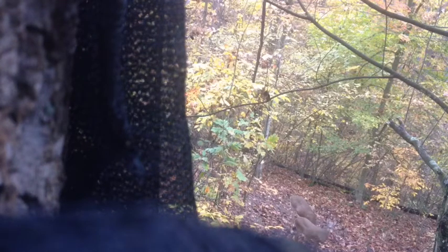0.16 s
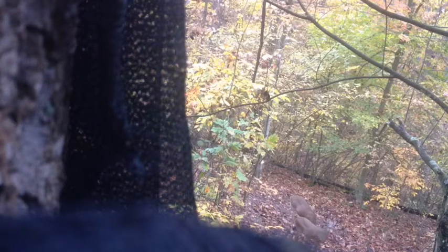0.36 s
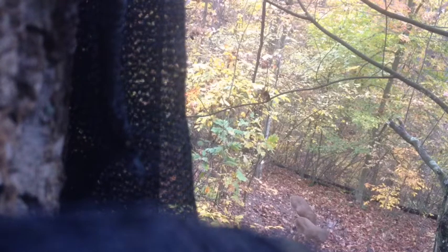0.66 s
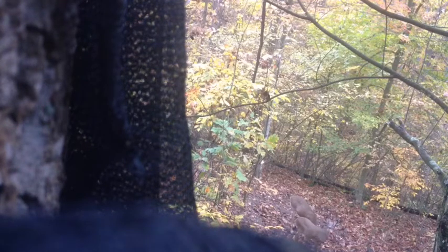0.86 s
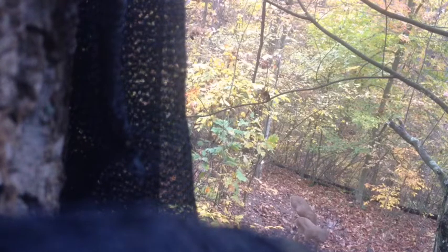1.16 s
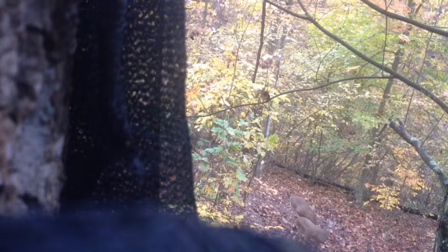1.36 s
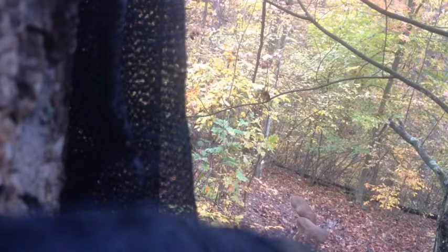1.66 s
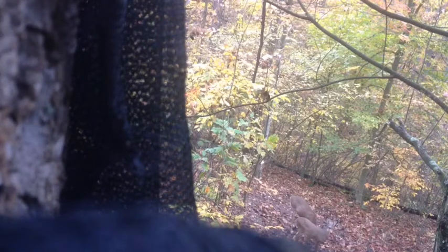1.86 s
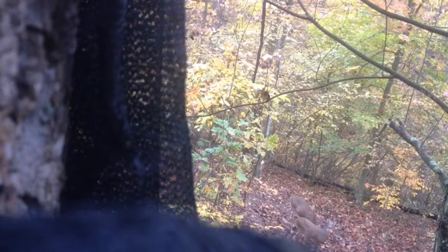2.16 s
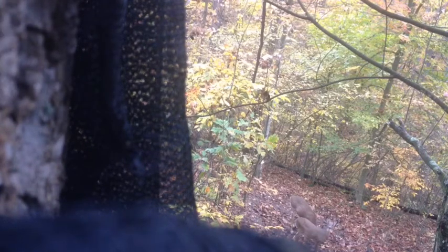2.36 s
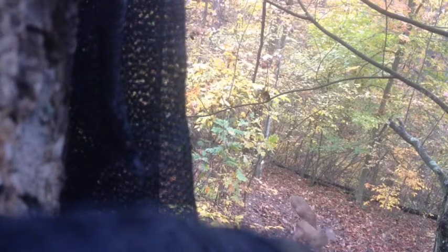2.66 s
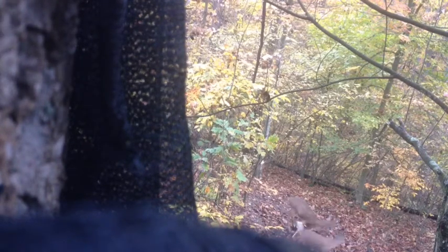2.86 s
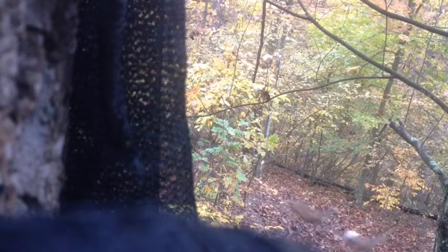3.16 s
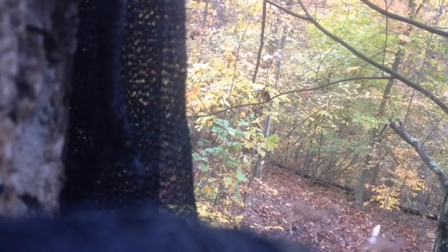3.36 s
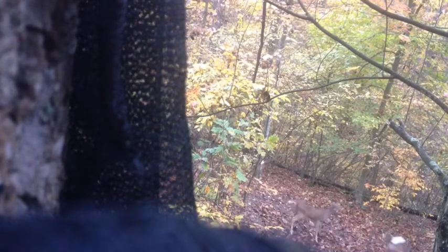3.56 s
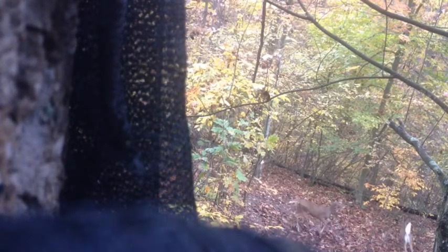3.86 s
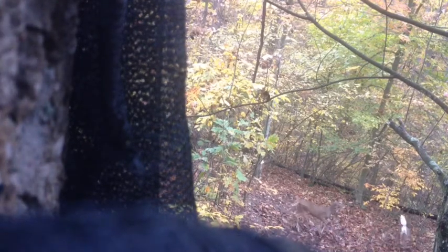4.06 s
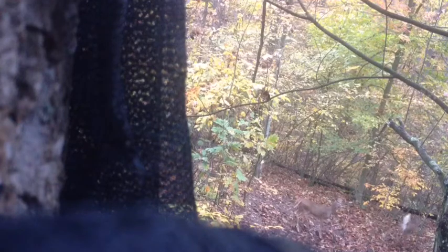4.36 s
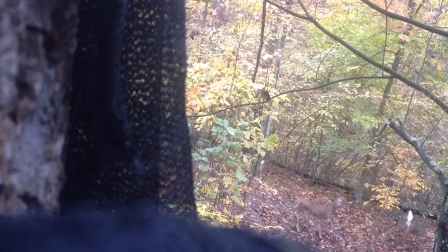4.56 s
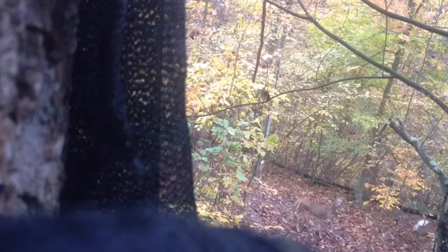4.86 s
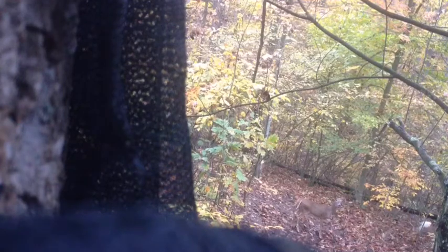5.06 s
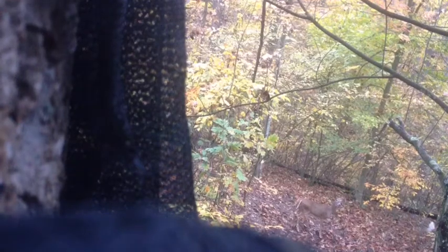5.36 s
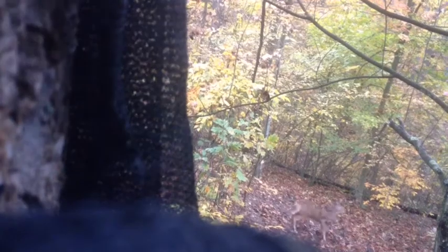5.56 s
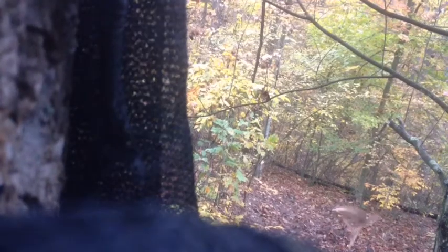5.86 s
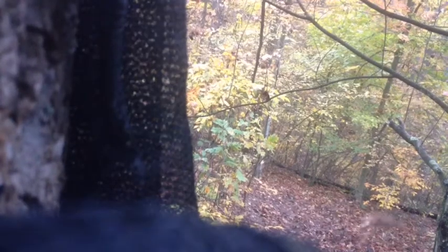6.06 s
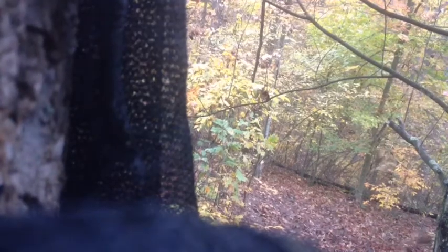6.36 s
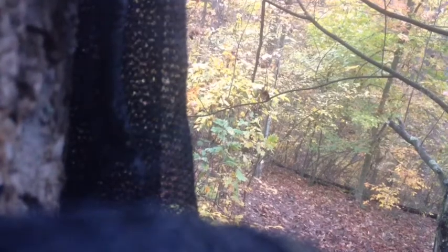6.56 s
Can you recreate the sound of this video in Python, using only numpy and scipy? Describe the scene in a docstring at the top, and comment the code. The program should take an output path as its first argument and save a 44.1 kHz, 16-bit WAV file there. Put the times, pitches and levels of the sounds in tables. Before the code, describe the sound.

Hushed autumn woods. Close to the microphone a bow is drawn with faint scraping, thin squeaks and tiny clicks while a deer steps softly through dry leaves and stops. After a still pause the string releases with a very loud, bright crack and short rattling ring. A quarter second later the arrow hits with a hollow knock, and the deer bolts farther off, crunching leaves and breaking twigs.

```python
"""A bow is drawn and shot right beside the microphone, in quiet autumn woods.
Its arrow slides over the rest as filtered noise and crackle; a deer bounds through dry leaves and stops.
The string cracks into a ring of decaying partials, and the arrow thumps home a quarter second later.
The deer crashes off in bursts of tiny fractures, dull thuds and snapping twigs.
A hush of coloured noise with faint drones lies beneath, and the trunks throw back a scattered echo."""
import sys
import numpy as np
from scipy import signal
from scipy.io import wavfile

SR = 44100
rng = np.random.default_rng(int(sys.argv[2]) if len(sys.argv) > 2 else 0)


def master(y):
    """Save y as 16-bit WAV."""
    cut = np.clip(np.atleast_2d(y).T, -1, 1)
    pcm = np.round(cut * 32767)  # scale
    wavfile.write(sys.argv[1], SR, pcm.astype(np.int16))


N = 296425
TIME = np.arange(N) / SR
HZ = np.fft.rfftfreq(2048, 1 / SR)
BRIEF = SR // 5  # samples in one snap or thud


def draw(squeak_share=.08, sing_db=-10, fullness=.7, glide_per_s=.04, wander=.02,
         bump_db=-54, bump_hz=198, bump_lead_s=.021):
    """The shaft sings thinly over the rest, its resonances rising as it travels; hard pulls rasp and bump."""
    # resonances of the shaft on its rest, before their shift: pitch_hz, width_hz, relative_db
    shaft = [(2750, 420, -5), (3190, 300, -3), (5640, 500, -3), (6170, 500, -8), (7120, 400, -8),
             (7800, 410, -5.5)]
    # colour of the rasp under a hard pull: frequency_hz, relative_db (per Hz)
    rasp_colour = [(90, -12.5), (200, -4), (400, 1), (1300, 1.5), (1900, -3.5), (2750, 10.5), (3300, 3),
                   (3900, 0), (4900, -8.5), (5800, 2), (7000, -2), (9500, -17.5), (13500, -10.5),
                   (15000, -13.5)]
    # hard pulls of the string: start_s, length_s, rasp_db
    pulls = [(2.416, .098, -53), (2.626, .082, -53.5)]
    # thin squeaks of the shaft: start_s, length_s, pitch_hz, level_db
    squeaks = [(2.04, .25, 2680, -67), (2.25, .17, 3180, -69), (2.602, .04, 6150, -56.5)]
    start_s, full_s, end_s = 1.4, 2.55, 3.1
    # friction builds steadily up to full draw, then fades as the bow is held
    friction_db, build_db_per_s, ease_db_per_s, scrape_db = -65.5, 14, 38, -5.5

    t = TIME[(TIME > start_s) & (TIME < end_s)]
    count, to_full, out = len(t), t - full_s, np.zeros(N)
    friction = amp(friction_db + np.minimum(build_db_per_s * to_full, -ease_db_per_s * to_full))
    pull = sum(amp(db) * arch(t, s, length) ** fullness for s, length, db in pulls)

    shift = 1.035 + glide_per_s * to_full + wander * waver(count, per_s=12)
    ring = sum(amp(db) * unit(resonate(rng.standard_normal(count), hz * shift, width))
               for hz, width, db in shaft)
    singing = (friction + amp(sing_db) * pull) * unit(ring)

    slips = crackle(count, per_s=2000, spread_db=3, wash=.8, clump_db=1.4)
    scraping = (amp(scrape_db) * friction + pull) * colour(slips, read(rasp_colour))
    add(out, t[0], singing + scraping)

    for s, length, hz, db in squeaks:
        squeak = unit(resonate(rng.standard_normal(count), hz, squeak_share * hz))
        add(out, t[0], amp(db) * arch(t, s, length) * squeak)
    for s, length, _ in pulls:
        add(out, s + length - bump_lead_s, thud(bump_db, bump_hz, cycles=12))
    return out


def shot(slam_db=-4, rattle_db=-18.3, rattle_t60=0.17, buzz_db=-45, buzz_hz=3200, zip_db=-12, zip_hz=2500):
    """The string zips forward, slams to a stop and leaves the bow ringing and rattling."""
    # partials of limbs, string and riser: pitch_hz, level_db, t60_s
    partials = [(191, -40.5, 0.39), (271, -38.5, .08), (367, -27, 0.044), (442, -19.5, 0.11),
                (491, -27, 0.082), (577, -25, 0.083), (791, -31, .08), (1047, -33, .2), (1103, -28, 0.1),
                (1552, -39, 0.32), (2410, -39, 0.21), (3100, -39.5, 0.22), (3205, -35, 0.22),
                (3495, -31.5, 0.23), (4020, -34, 0.13), (4493, -23.5, 0.099), (4680, -28.5, 0.18),
                (4970, -21.5, 0.054), (5790, -14.5, 0.038), (6130, -29, 0.083), (7160, -30, 0.12),
                (7810, -26.5, 0.13), (8320, -32, .11)]
    # colour of the string's slam: frequency_hz, relative_db (per Hz)
    slam_colour = [(100, -52), (330, -17), (700, -27), (1400, -18), (2000, -14), (2800, -2.5), (4300, 3),
                   (5850, 2.5), (6700, -5), (8300, -13.5), (10000, -22.5), (13000, -9.5), (15000, -17)]
    # colour of the bow's rattle: frequency_hz, relative_db (per Hz)
    rattle_colour = [(80, -40.5), (190, -3.5), (420, 3.5), (700, -3), (1100, -0.5), (1400, -5),
                     (2000, -6.5), (2700, -1.5), (5800, -5.5), (6600, -7), (8400, -2), (9600, -9),
                     (13000, -8.5), (15000, -14.5)]
    shot_s = 5.2083

    out = np.zeros(N)
    ring = modes(partials, rough=.55, flutter_share=.045)
    blow = rng.choice([-1., 1.], SR) * swell(rise=.0002, t60=.03)
    slam = amp(slam_db) * colour(blow, read(slam_colour))
    chatter = crackle(SR, per_s=4000, spread_db=2.5, wash=1, clump_db=1.5)
    chatter = chatter * swell(rise=.003, t60=rattle_t60)
    rattle = amp(rattle_db) * colour(chatter, read(rattle_colour))
    # a loose fitting buzzes on, then seats itself
    buzz = unit(resonate(rng.standard_normal(SR), buzz_hz, width=380)) * swell(rise=.04, t60=.45)
    buzz = buzz * np.interp(TIME[:SR], [.15, .18], [1, 0])
    add(out, shot_s, ring + slam + rattle + amp(buzz_db) * buzz)

    # the last few milliseconds of travel: a short whistle rising from .9 to 1.147 of zip_hz
    run_up = np.linspace(0, 1, 130)
    whistle = np.sin(2 * np.pi * np.cumsum(zip_hz * (.9 + 0.247 * run_up)) / SR)
    add(out, shot_s - len(run_up) / SR, amp(zip_db) * np.sqrt(run_up) * whistle)
    return out


def gear(release_s=5.1893, rush_s=5.2035):
    """Small clicks during the draw; the release trips, the arrow rushes over its rest, loose parts clack."""
    # clicks of the bow and its gear during the draw: start_s, level_db, centre_hz
    clicks = [(1.533, -55, 2400), (1.733, -57, 6440), (2.299, -47, 600), (2.387, -53, 2280),
              (2.574, -43.5, 4740), (2.958, -56.5, 2600)]
    # loose parts clacking after the slam: start_s, level_db
    clacks = [(5.2187, -12), (5.2221, -15), (5.2395, -25), (5.267, -28.5)]

    out = np.zeros(N)
    for s, db, hz in clicks:
        add(out, s, snap(db, hz, octaves=.8, t60=.024))
    add(out, release_s, snap(db=-36.5, hz=3800, octaves=1.5, t60=.079))
    add(out, release_s, snap(db=-39, hz=550, octaves=1.2, t60=.15))
    add(out, rush_s, snap(db=-32, hz=3000, octaves=1.4, t60=.093))
    for s, db in clacks:
        add(out, s, snap(db, hz=7200, octaves=1.4, t60=.005))
    return out


def hit(lead_s=.0215, tick_lead_s=.0178, knock_gap_s=.026, knock_db=-33.5, knock_hz=228, knock_fall_db=8,
        shaft_db=-6, shaft_lag_s=.007):
    """After a rustle and a tick the arrow cracks and knocks hollowly, then jolts a few times, ever weaker."""
    # partials of the ribcage struck by the arrow: pitch_hz, level_db, t60_s
    ribs = [(175, -37, 0.088), (520, -23.5, 0.021), (810, -35, 0.057), (954, -28.5, 0.03),
            (1366, -33.5, 0.031), (1720, -35, 0.018), (2355, -33, 0.031), (7500, -46, .04)]
    hit_s = 5.445

    out = np.zeros(N)
    add(out, hit_s - lead_s, snap(db=-46, hz=700, octaves=1.6, t60=.13))
    tick = snap(db=-42, hz=1800, octaves=.68, t60=.014) + thud(db=-44, hz=400, cycles=15)
    add(out, hit_s - tick_lead_s, tick)
    add(out, hit_s, modes(ribs, rough=0.23, flutter_share=.1))
    add(out, hit_s, snap(db=-36, hz=9000, octaves=1.8, t60=.03))
    add(out, hit_s, snap(db=-43, hz=1200, octaves=1.3, t60=.1))
    for k in range(3):
        s = hit_s + (k + 1) * knock_gap_s
        db = knock_db - k * knock_fall_db
        add(out, s, thud(db, knock_hz, cycles=6.5))
        add(out, s + shaft_lag_s, snap(db + shaft_db, hz=1280, octaves=.35, t60=.04))
    return out


def leaves(stem_hz=1450, stem_octaves=0.89):
    """Each stride crushes a burst of leaves, which go on settling; crushed stems fill the middle."""
    # colour of dry leaves, before its tilt: frequency_hz, relative_db (per Hz)
    leaf_colour = [(60, -26), (170, 14.5), (340, 5), (520, 9.5), (780, 1.5), (1050, 2.5), (1500, 0),
                   (2000, 0.5), (2450, 1), (3800, 0.5), (5000, -0.5), (6800, -1), (9500, -11), (15000, -15)]
    # hooves ploughing the litter: start_s, level_db, rise_s, stems_db (crushed stems, in the colour)
    strides = [(2.725, -50.5, .055, 6.5), (3.107, -51, .051, 5), (3.254, -57.5, .0065, 5),
               (3.455, -57, .07, 1), (3.635, -60, .065, 1.5), (4.054, -56.5, .016, 1), (4.24, -63, .035, 1),
               (5.443, -42.5, .003, -4.5), (5.5, -56, .06, -2), (5.808, -47.5, .009, 2),
               (5.967, -57, .01, 2), (6.062, -48, .005, 4), (6.245, -49, .03, -8), (6.299, -43.5, .01, -1),
               (6.429, -52.5, .005, 1), (6.54, -46.5, .032, -1), (6.639, -52, .024, -2)]
    # stirring beneath the strides, a level curve: time_s, level_db
    stir = [(.8, -84), (1.0, -73), (3.2, -69.5), (4.5, -74), (5.15, -81), (5.55, -66), (5.95, -64),
            (6.12, -53.3), (6.72, -54.3)]
    # a stride dies quickly, then thrown leaves settle; below firm_db their share grows as strides soften
    crush_t60, settle_t60, settle_db, firm_db, settle_db_per_db = .15, .6, -11.5, -50, .75
    # strides with few stems are brighter: dB per octave, and its fall per dB of stems
    bright_db, dull_per_stem = 1.3, .27

    octave = np.log2(HZ + 1)
    stems = np.exp(-((octave - np.log2(stem_hz)) / stem_octaves) ** 2)
    settling = crunch(N, per_s=350, spread_db=4, wash=.8, clump_db=2.8)
    litter = crunch(3 * SR, per_s=600, spread_db=3.7, wash=.8, clump_db=2.6)
    out = amp(curves(stir)[0]) * colour(settling, read(leaf_colour) + .8 * octave)
    for s, db, rise, stem_db in strides:
        crush = litter[rng.integers(2 * SR):][:SR]
        thrown = amp(settle_db - settle_db_per_db * min(db - firm_db, 0))
        envelope = np.hypot(swell(rise, crush_t60), thrown * swell(rise, settle_t60))
        tilt = bright_db - dull_per_stem * stem_db
        stride_colour = read(leaf_colour) + tilt * octave + stem_db * stems
        add(out, s, amp(db) * colour(crush * envelope, stride_colour))
    return out


def twigs(octaves=.75, small_db=-56, small_hz=2000, small_t60=.03, spread_db=2.5, count=8):
    """A few twigs break loudly as brief volleys; smaller ones go at random as the deer runs."""
    # twigs broken underfoot: start_s, level_db, centre_hz, t60_s
    breaks = [(3.162, -49.5, 2500, .025), (3.2562, -48.5, 2470, .025), (4.059, -52, 3980, .037),
              (5.972, -52, 1700, .025), (6.005, -46.5, 596, .032), (6.063, -41, 2870, .046),
              (6.158, -43, 1500, .016), (6.1825, -33, 1400, .013), (6.2069, -35.5, 2960, .0073),
              (6.2728, -34.5, 7000, .018), (6.432, -42.5, 1900, .038), (6.565, -42, 2250, .034),
              (6.587, -44, 3200, .022)]
    bolt_s = 6.05  # the deer is running from here on

    out = np.zeros(N)
    for s, db, hz, t60 in breaks:
        add(out, s, snap(db, hz, octaves, t60))
    for when, size, pitch in rng.uniform(-1, 1, (count, 3)):
        s = np.interp(when, [-1, 1], [bolt_s, TIME[-1]])
        add(out, s, snap(small_db + spread_db * size, small_hz * 2 ** pitch, octaves, small_t60))
    return out


def thuds():
    """Hooves strike the soft ground with low, quickly dying tones that sag in pitch."""
    # dull blows, timed half a cycle after they start: time_s, peak_db, pitch_hz (nominal)
    blows = [(3.162, -48, 169), (4.068, -53, 125), (6.005, -46, 183), (6.022, -50, 141), (6.184, -43, 340),
             (6.19, -47, 153), (6.272, -49, 190), (6.306, -42, 204), (6.57, -46, 180), (6.661, -51.5, 220)]
    out = np.zeros(N)
    for s, db, hz in blows:
        add(out, s - .5 / hz, thud(db, hz, cycles=9))
    return out


def air(db=-66.0, hum_hz=200):
    """The hush of the woods is coloured noise, with narrow noise bands for drones and a distant hum."""
    # colour of the still woods: frequency_hz, relative_db (per Hz)
    hush_colour = [(30, -13.5), (55, -26.5), (85, -19), (115, -7), (180, -1.5), (270, -6.5), (450, -9.5),
                   (700, -12), (1500, -18), (3000, -20), (7000, -24), (10000, -32.5), (14500, -27)]
    # faint steady tones: pitch_hz, width_hz, level_db
    drones = [(86.6, 1.9, -83.5), (177.3, 25.2, -75), (3780, 460, -76.5)]
    # the hum swells once
    base_db, swell_db, peak_s, swell_s = -75.5, 8, 4.45, .65

    out = amp(db) * colour(rng.standard_normal(N), read(hush_colour))
    for hz, width, level in drones:
        out += amp(level) * unit(resonate(rng.standard_normal(N), hz, width))
    hum_db = base_db + swell_db * np.exp(-((TIME - peak_s) / swell_s) ** 2)
    return out + amp(hum_db) * unit(resonate(rng.standard_normal(N), hum_hz, width=7.1))


def woods(x):
    """Scattered echoes from trunks and ground, each band dying at its own speed."""
    # echo decay among the trunks: frequency_hz, t60_s
    decay = [(150, 0.45), (500, 0.33), (1500, 0.46), (3200, .43), (6000, .37), (8500, 0.39), (14000, .34)]
    # about 2500 random reflections a second, gathering over the first 15 ms
    taps = rng.standard_normal(SR) * (rng.random(SR) < 2500 / SR) * np.minimum(TIME[:SR] / 0.015, 1)
    hz, t, z = signal.stft(taps, SR, nperseg=256)
    fading = z * amp(-60 * t / read(decay, hz)[:, None])
    tail = signal.istft(fading, SR, nperseg=256)[1]
    return signal.oaconvolve(x, tail / np.linalg.norm(tail))[:N]


def modes(table, rough, flutter_share, loosen_s=0.035):
    """One second of a struck body's ring: it starts clean, then each partial flutters, the high ones faster."""
    t, out = TIME[:SR], np.zeros(SR)
    depth = rough * np.minimum(t / loosen_s, 1)
    for k, (hz, db, t60) in enumerate(table):
        flutter = 1 + depth * (waver(SR, flutter_share * hz) + 1j * waver(SR, flutter_share * hz))
        onset = np.minimum(2 * hz * t, 1)  # rises over half a cycle
        wave = (flutter * np.exp(2j * np.pi * hz * t)).imag
        out += (-1) ** k * onset * amp(db - 60 * t / t60) * wave
    return out / np.sqrt(1 + 2 * depth ** 2)


def snap(db, hz, octaves, t60):
    """A brief volley of fractures in one broad resonance."""
    volley = rng.choice([-1., 1.], BRIEF) * swell(rise=.00013, t60=t60, count=BRIEF)
    body_db = -20 * np.log10(1 + (np.log2((HZ + 1) / hz) / octaves) ** 2) - 2 * np.log2(1 + HZ / hz)
    bass_loss_db = 20 * np.log10(1 + (150 / (HZ + 1)) ** 2)
    sound = colour(volley, body_db - bass_loss_db)
    return amp(db) * unit(sound) * np.std(volley)


def thud(db, hz, cycles, sag=.3):
    """A soft, heavy blow: it builds over one cycle, sags in pitch and dies within so many cycles."""
    turns = np.cumsum(hz * (.85 + sag * np.exp(-TIME[:BRIEF] / .012))) / SR
    return amp(db) * swell(rise=1 / hz, t60=cycles / hz, count=BRIEF) * np.sin(2 * np.pi * turns)


def crunch(count, per_s, spread_db, wash, clump_db):
    """Leaves and stems crackle in octave bands by size; small, bright pieces are the most numerous."""
    out = np.zeros(count)
    for hz in np.geomspace(400, 12800, 6):
        band = signal.butter(1, [hz / np.sqrt(2), hz * np.sqrt(2)], "band", fs=SR)
        smallness = hz / 2500
        clumping = clump_db / np.sqrt(1 + smallness / 2)
        out += signal.lfilter(*band, crackle(count, per_s * smallness, spread_db, wash, clumping))
    return unit(out)


def crackle(count, per_s, spread_db, wash, clump_db=2):
    """Clumps of tiny, very unequal fractures over a wash of countless smaller ones."""
    sizes = amp(spread_db * np.minimum(rng.exponential(1, count), 4)) * rng.choice([-1, 1], count)
    grains = unit(sizes * (rng.random(count) < per_s / SR)) + wash * rng.standard_normal(count)
    return unit(grains * amp(clump_db * waver(count, per_s=170)))


def resonate(x, hz, width):
    """A steep resonance whose pitch may follow a curve."""
    turn = np.exp(2j * np.pi * np.cumsum(hz * np.ones(len(x))) / SR)
    r = np.exp(-np.pi * width / SR)
    # shift the band down to zero, smooth it there, shift it back
    return (turn * signal.lfilter([(1 - r) ** 2], [1, -2 * r, r * r], x / turn)).real


def colour(x, db):
    """Causal minimum-phase filter of unit energy, shaped by the relative gain on HZ."""
    log_gain = np.log(amp(np.maximum(db - db.max(), -90)))
    circle = np.r_[log_gain, log_gain[-2:0:-1]]
    taps = np.fft.ifft(np.exp(np.conj(signal.hilbert(circle)))).real
    return signal.oaconvolve(x, taps / np.linalg.norm(taps))[:len(x)]


def swell(rise, t60, count=SR):
    """An envelope, one second unless told otherwise: a rounded rise, then a decay."""
    t = TIME[:count]
    return np.sin(np.pi / 2 * np.minimum(t / rise, 1)) ** 2 * amp(-60 * np.maximum(t - rise, 0) / t60)


def arch(t, start, length):
    """A rounded rise and fall over the given stretch, silence outside it."""
    return np.sin(np.pi * np.clip((t - start) / length, 0, 1)).clip(0)


def waver(count, per_s):
    """Smooth chance of rms 1 that takes a new value so many times a second."""
    steps = np.arange(count) / SR * per_s
    return np.interp(steps, np.arange(count), rng.standard_normal(count)) * np.sqrt(3 / 2)


def amp(db):
    """Decibels to gain."""
    return np.exp(np.asarray(db) * np.log(10) / 20)


def unit(x):
    """Scales to rms 1."""
    return x / np.sqrt(np.mean(x ** 2) + 1e-20)


def read(points, hz=HZ):
    """Reads a curve of values on a log-frequency axis."""
    f, value = np.transpose(points)
    return np.interp(np.log(hz + 1), np.log(f), value)


def curves(rows):
    """Each column of a control table, sample by sample."""
    s, *columns = np.transpose(rows)
    return [np.interp(TIME, s, c) for c in columns]


def add(mix, s, sound):
    """Mixes a sound in at time s."""
    part = mix[round(s * SR):][:len(sound)]
    part += sound[:len(part)]


def scene(near_echo_db=-22, far_echo_db=-11, tick_echo_db=-14):
    """The bow is close with little echo; the deer is farther off among the trees, with more."""
    near = draw() + shot()
    far = hit() + leaves() + thuds()
    ticks = gear() + twigs()
    echo = woods(amp(near_echo_db) * near + amp(far_echo_db) * far + amp(tick_echo_db) * ticks)
    return (air() + near + far + ticks + echo)[None]


def record(dry, ceiling=1.05, low_cut_hz=70, edge_hz=15500):
    """The small microphone rounds off the highest peaks and sheds deep bass; then the band limit."""
    rounded = ceiling * np.tanh(dry / ceiling)
    thin = signal.lfilter(*signal.butter(2, low_cut_hz, "high", fs=SR), rounded)
    band_limit = signal.firwin(511, edge_hz, window=("kaiser", 9), fs=SR)
    return signal.oaconvolve(thin, band_limit[None], "same")


dry = scene()
out = record(dry)
master(out)
```